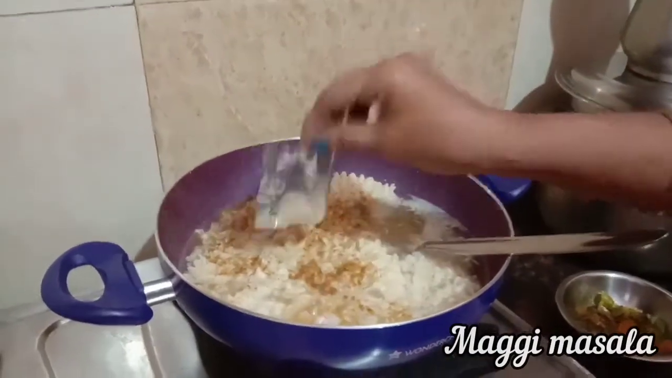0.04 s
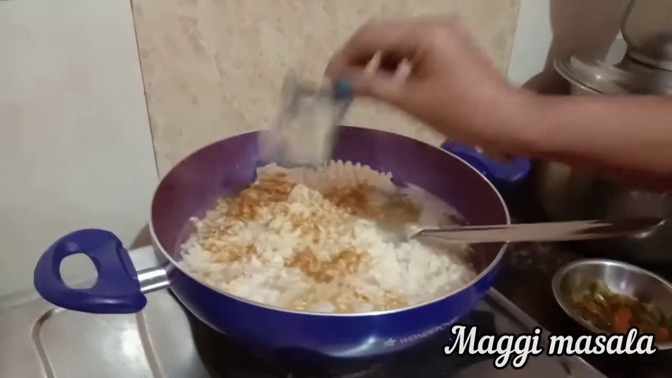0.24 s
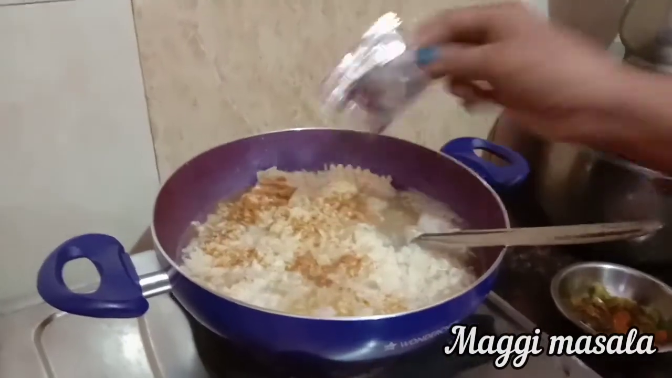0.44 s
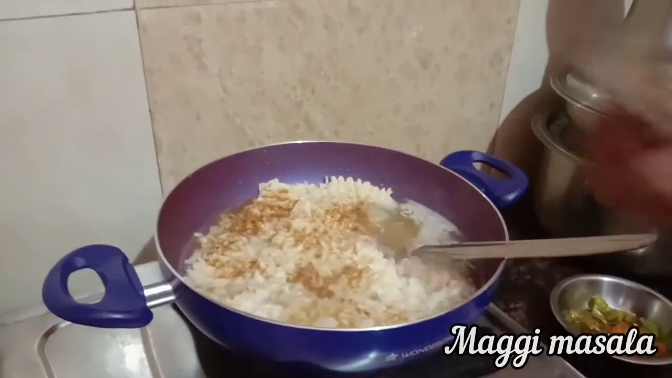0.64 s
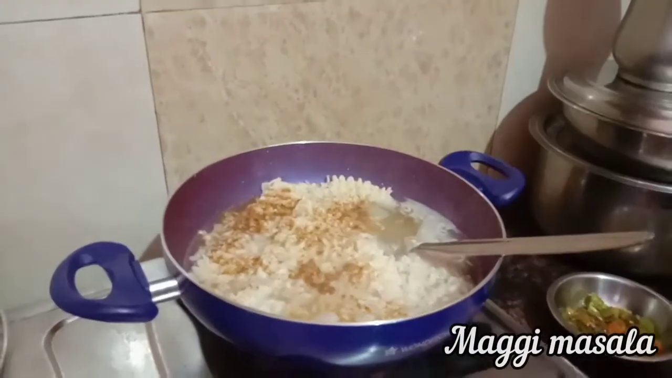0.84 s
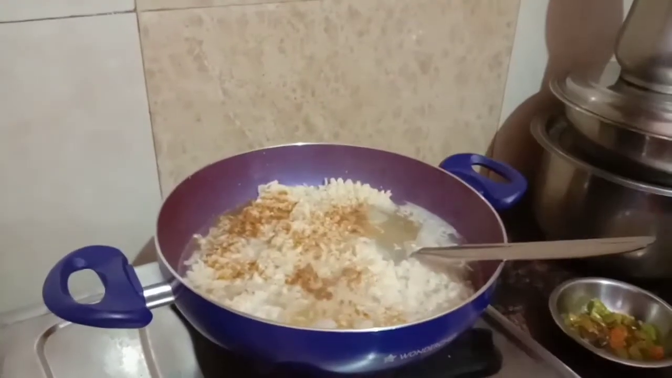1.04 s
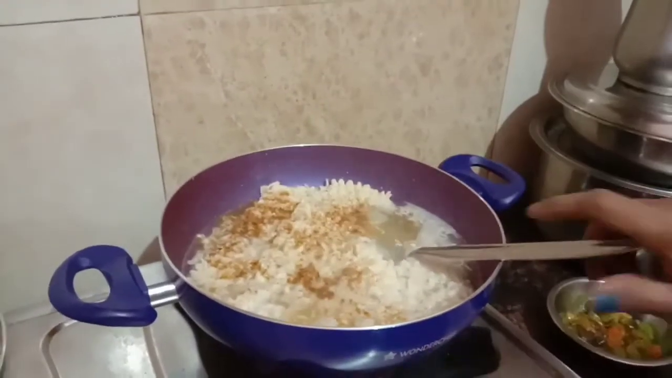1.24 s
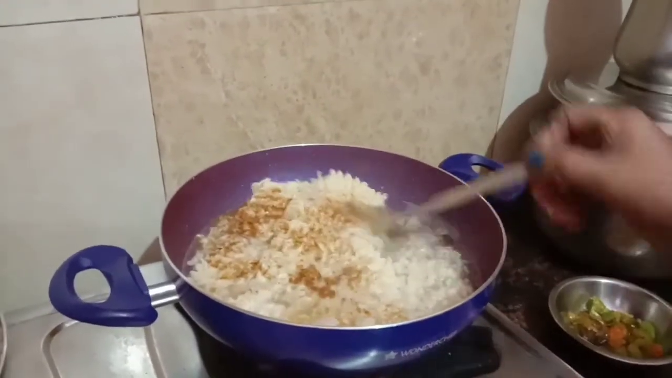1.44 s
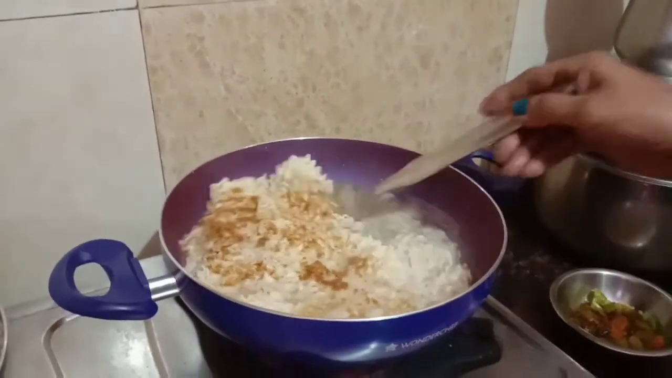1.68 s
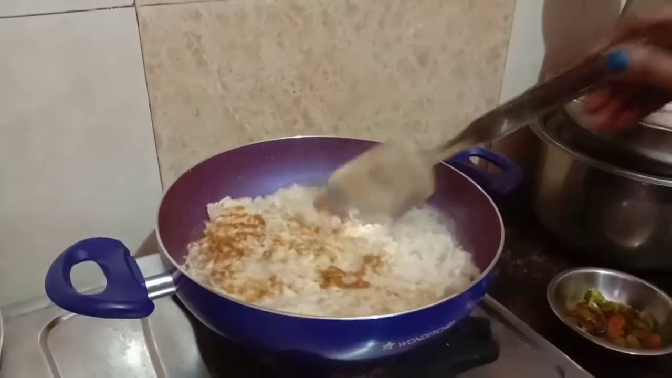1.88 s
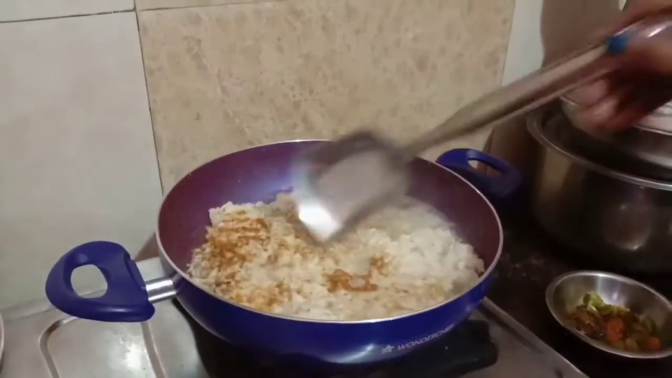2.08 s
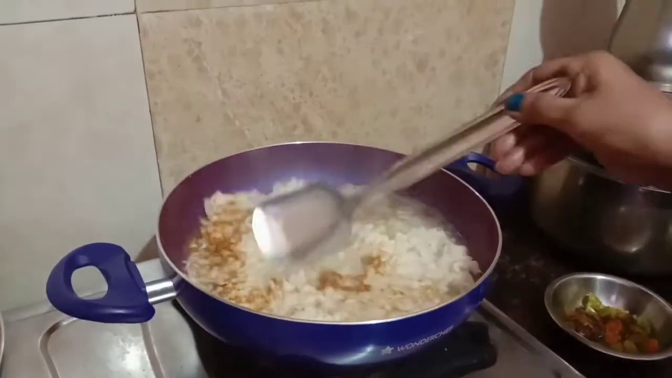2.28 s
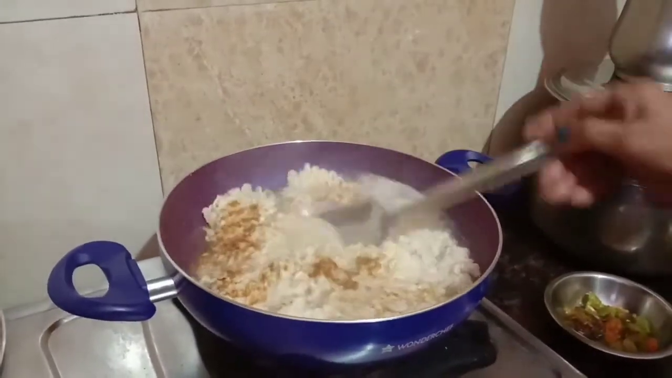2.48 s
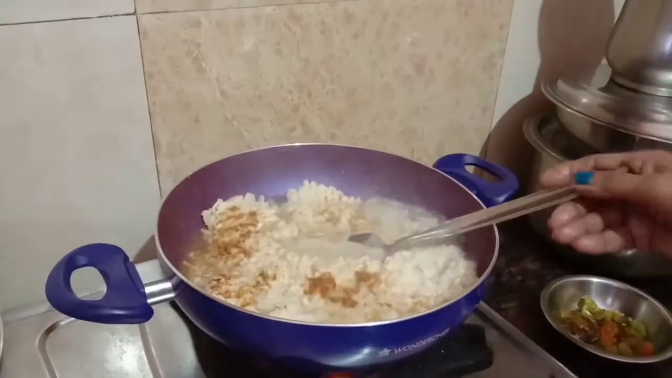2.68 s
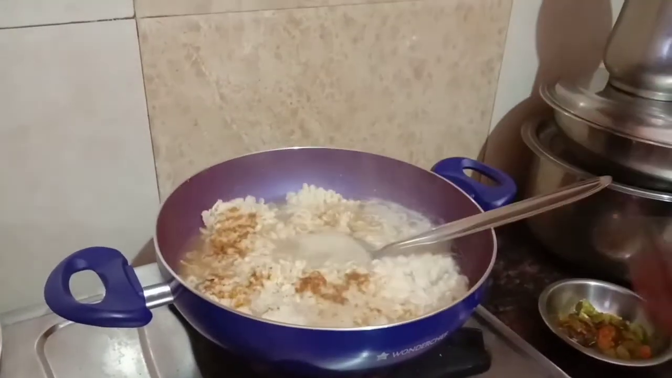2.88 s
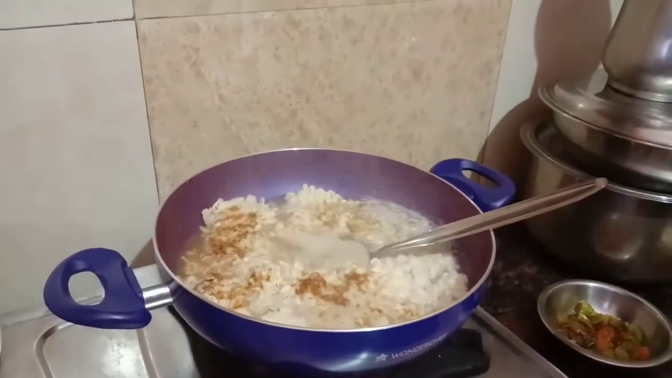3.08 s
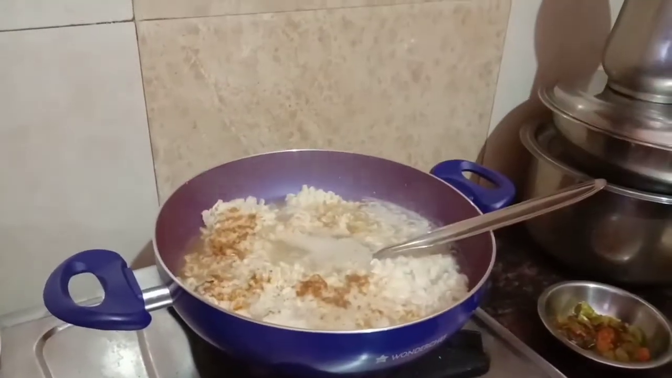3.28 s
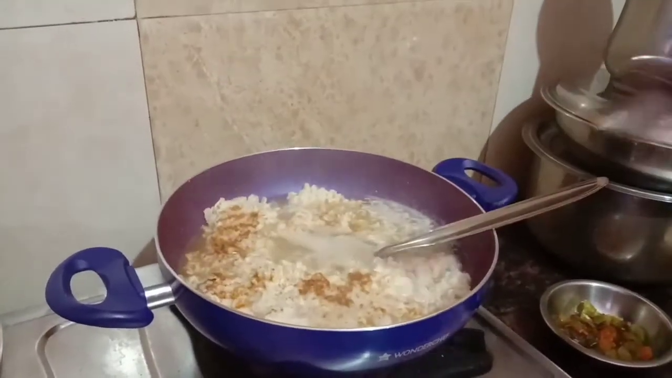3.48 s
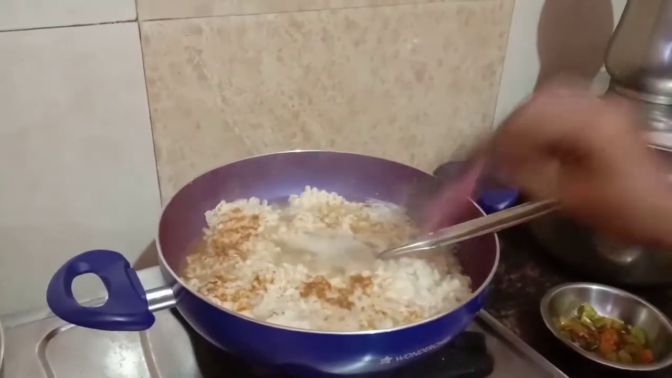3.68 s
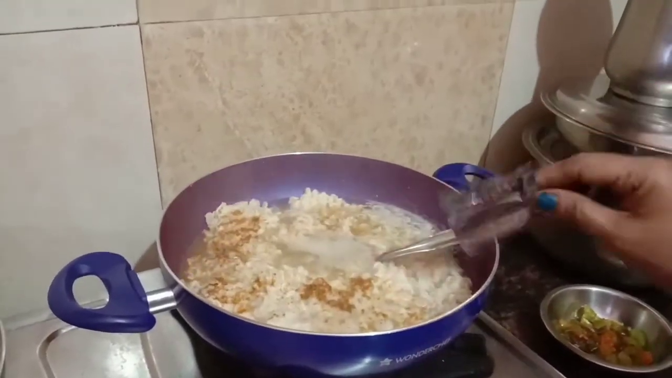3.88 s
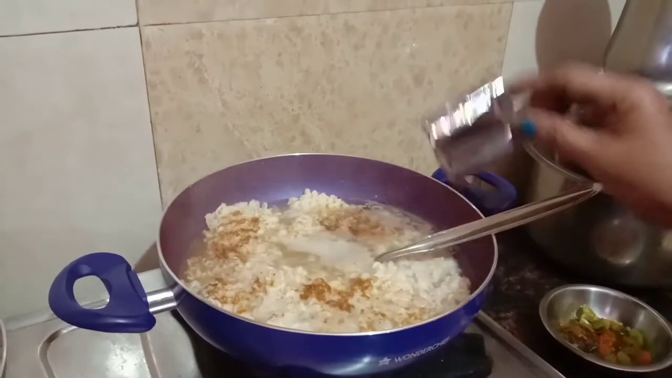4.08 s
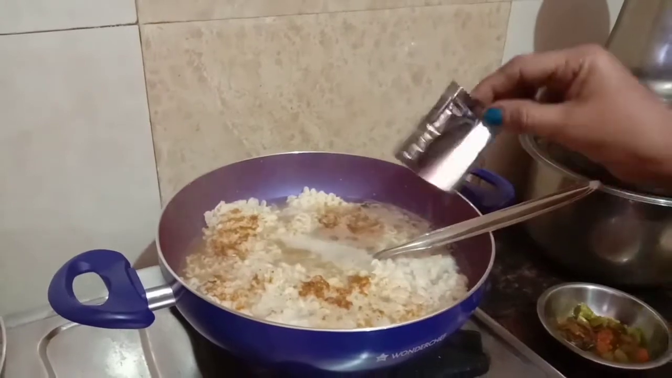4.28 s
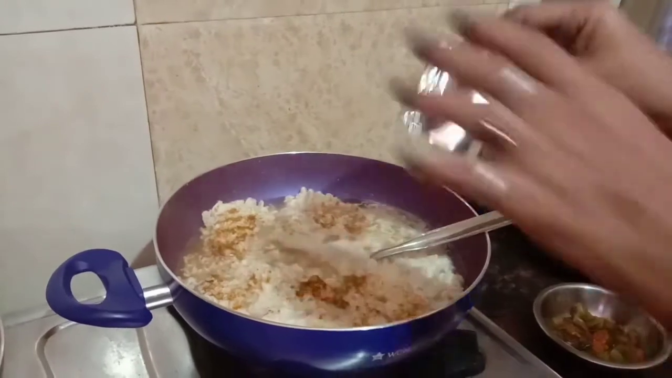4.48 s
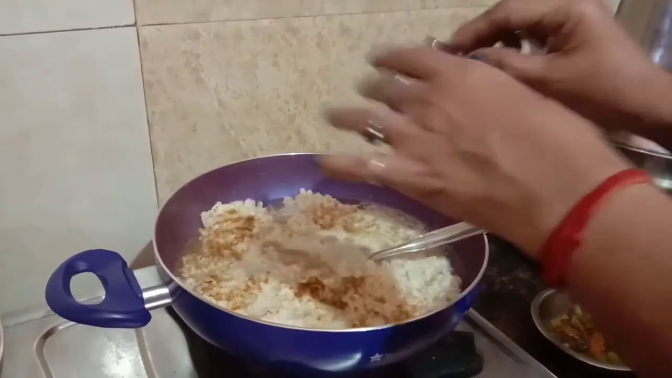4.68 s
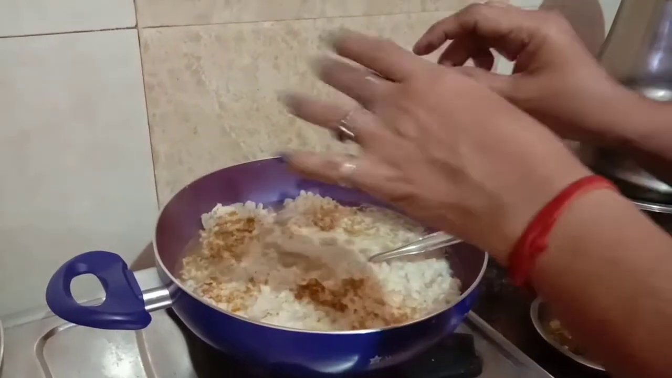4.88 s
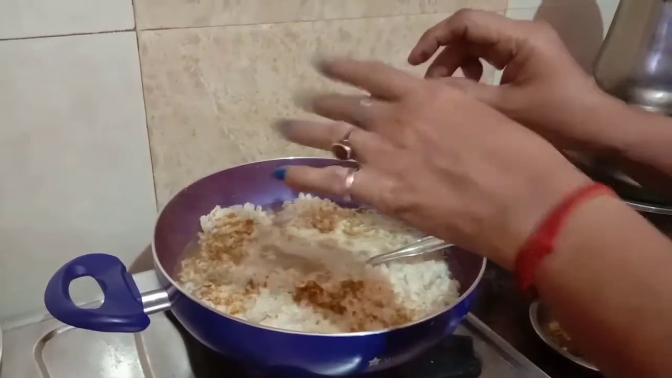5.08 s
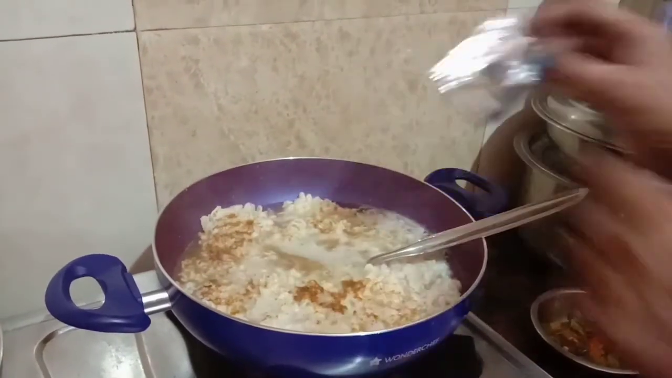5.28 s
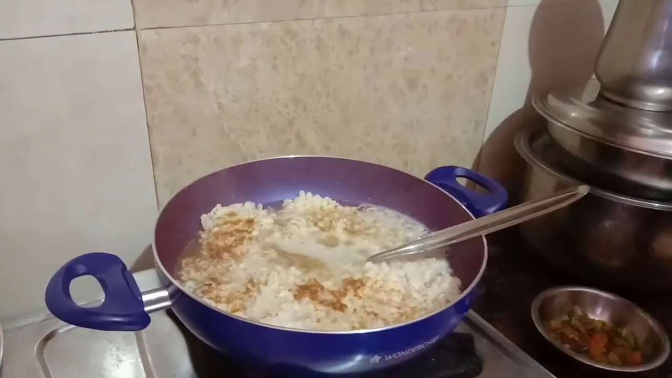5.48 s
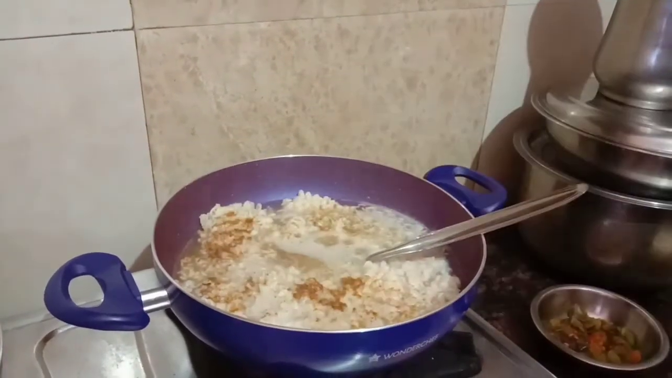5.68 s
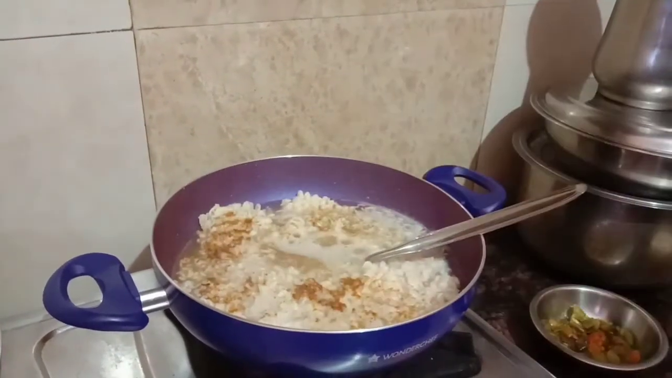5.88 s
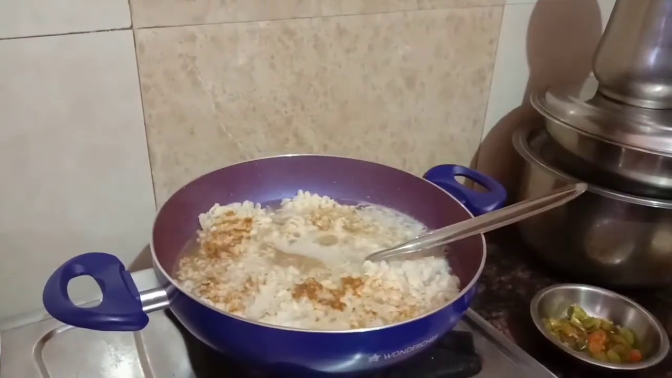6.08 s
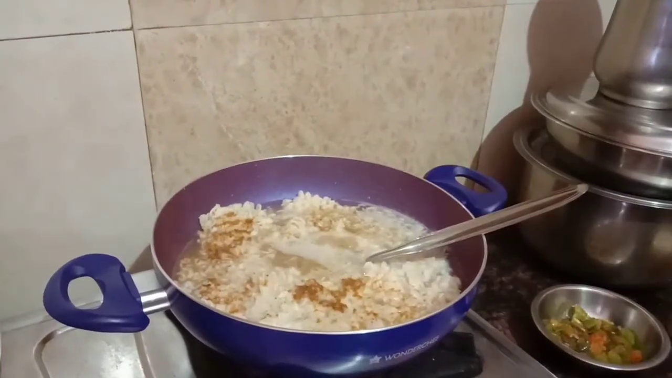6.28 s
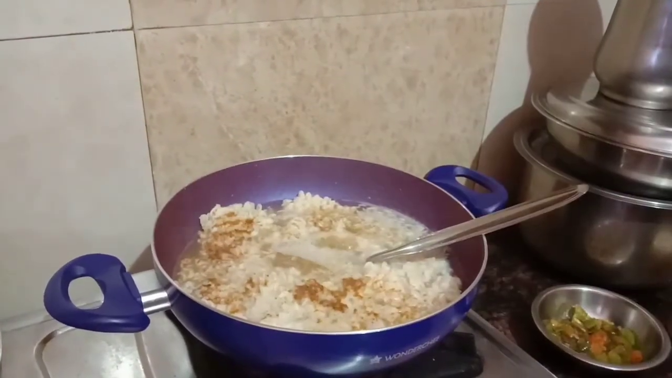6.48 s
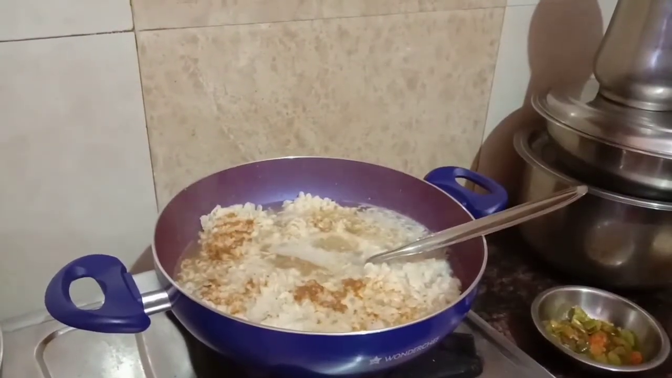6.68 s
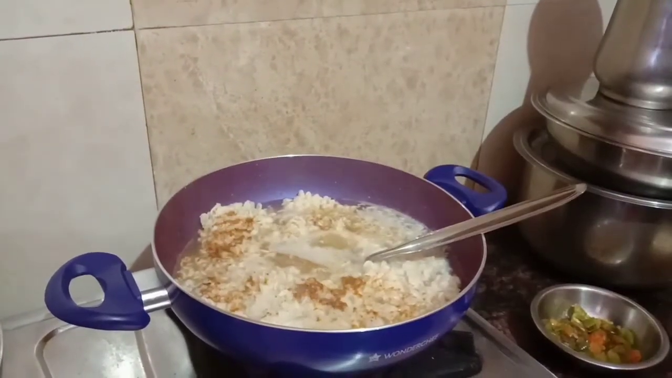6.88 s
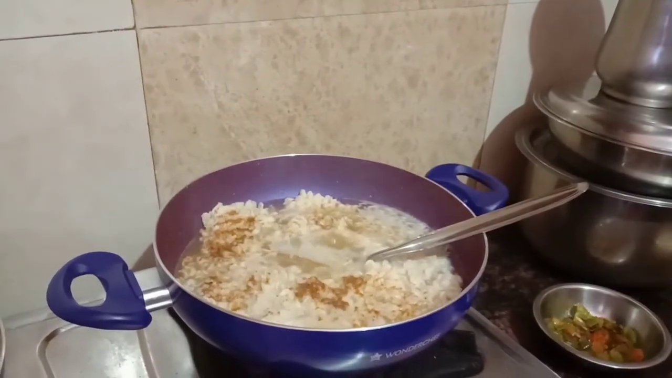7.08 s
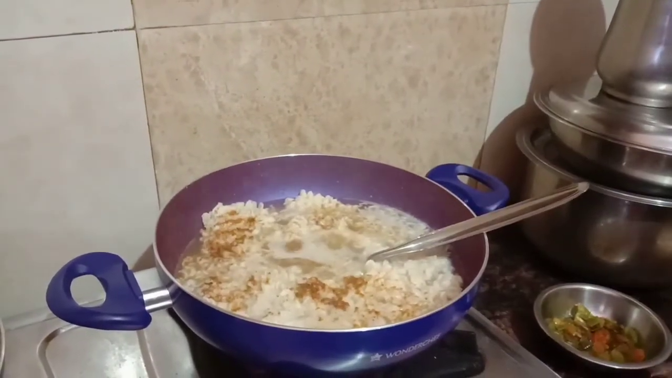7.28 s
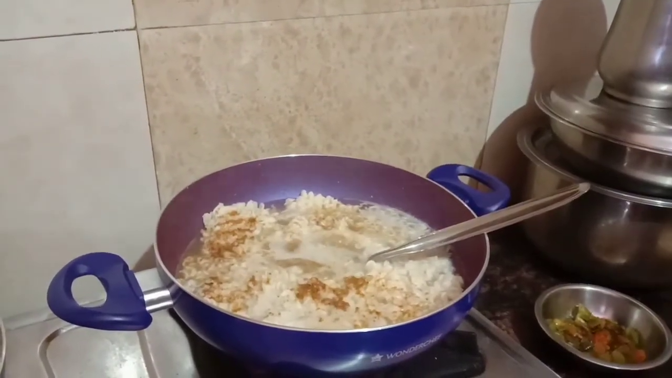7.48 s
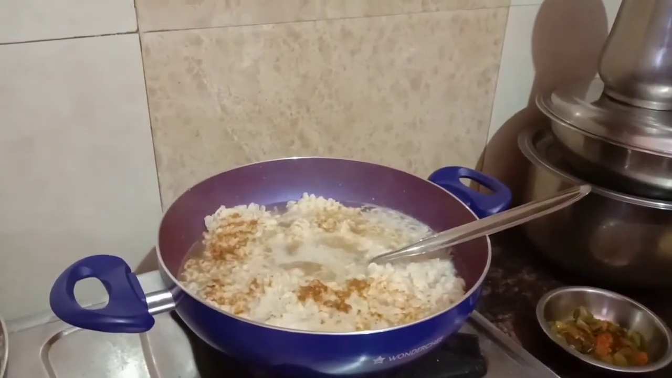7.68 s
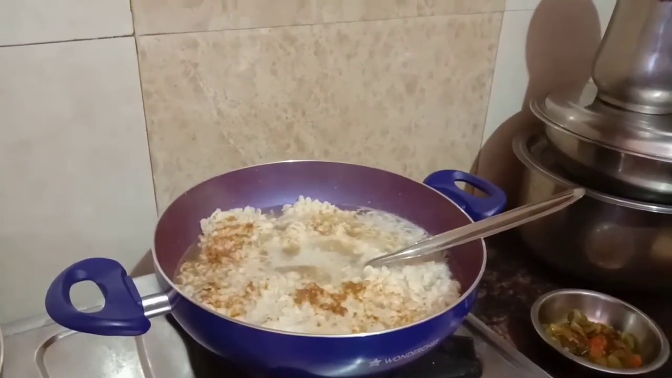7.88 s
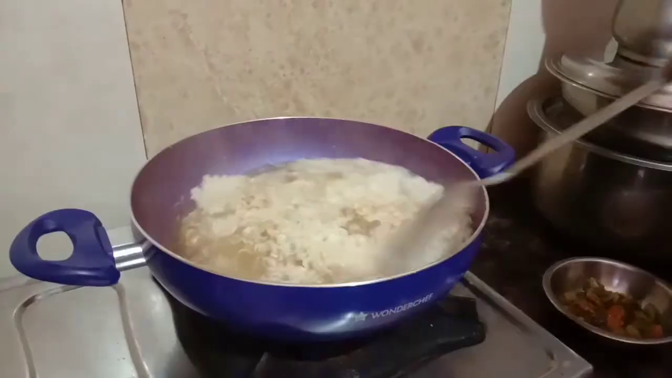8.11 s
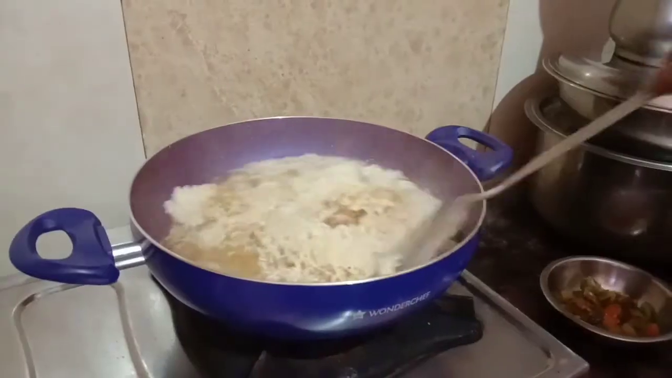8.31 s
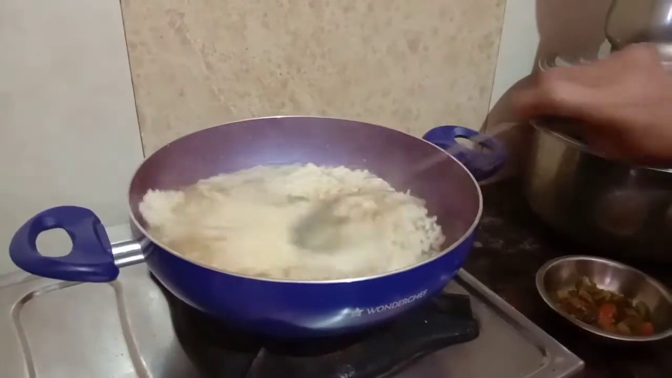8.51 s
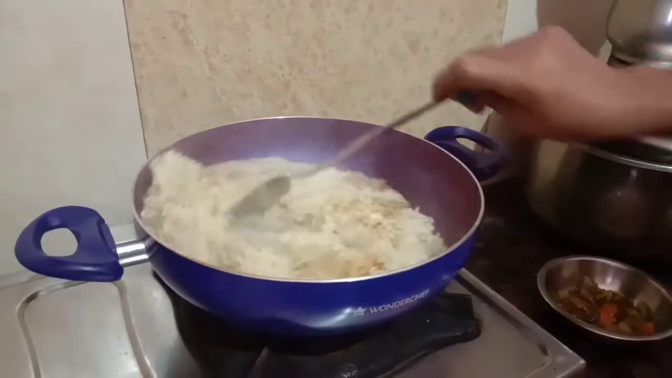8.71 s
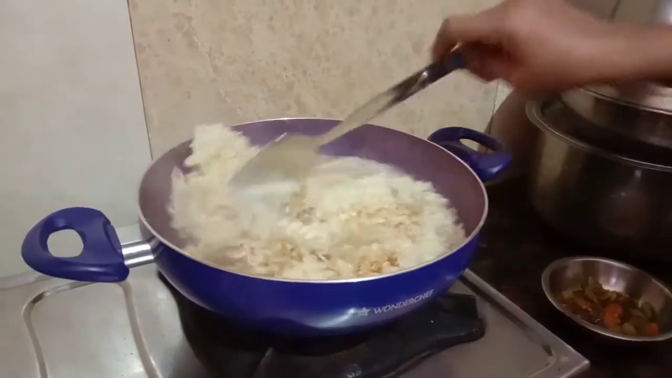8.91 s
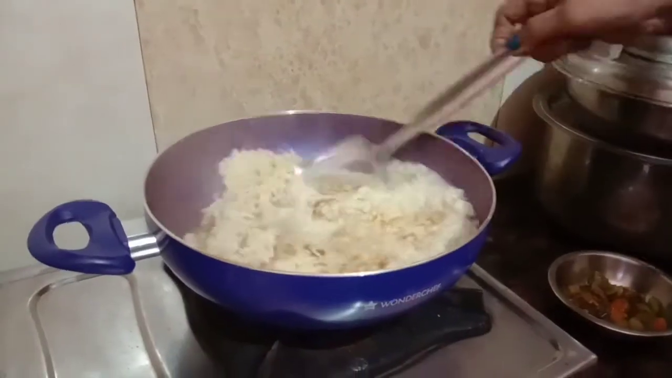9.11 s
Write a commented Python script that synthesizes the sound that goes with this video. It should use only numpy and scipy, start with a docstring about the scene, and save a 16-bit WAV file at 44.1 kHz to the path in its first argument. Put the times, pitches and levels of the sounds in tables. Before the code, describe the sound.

Noodles fizz and bubble in a pan over a gas flame while foil crackles, a steel spatula knocks and scrapes, and fingers bump the microphone.

```python
"""A finger rubs and briefly muffles a hand-held camera over noodles simmering on a gas flame in a small tiled kitchen.
Water fizzes as showers of tiny impulses, bubbles pop as rising chirps, and the pan throbs low as filtered noise.
A foil sachet crinkles in dying bursts of creases and is flicked empty; a steel spatula knocks and scrapes the pan.
Stirring quells the bubbles, then the boil builds up again.
Soft bumps and clicks sit right at the microphone; the sound drops out briefly near 8 s."""
import sys
import numpy as np
from scipy import signal
from scipy.fft import rfft, irfft, next_fast_len
from scipy.io import wavfile
from scipy.ndimage import uniform_filter1d, map_coordinates

SR = 44100
rng = np.random.default_rng(int(sys.argv[2]) if len(sys.argv) > 2 else 0)


def generate_wav(signal):
    """Clip the signal to [-1, 1] and save it as 16-bit WAV at the path in sys.argv[1]."""
    frames = np.transpose(np.atleast_2d(signal))
    scaled = np.clip(frames, -1, 1) * 32767
    pcm = np.round(scaled).astype(np.int16)
    wavfile.write(sys.argv[1], SR, pcm)


N = 403424
TIME = np.arange(N) / SR  # s
AGE = np.arange(SR // 2) / SR  # time since the start of an event, s

# tone of bubbling water: (frequency [Hz], level [dB])
BUBBLING_TONE = [(100, -27.5), (280, -7), (450, -10), (800, 3), (1000, -18), (1300, -7), (1700, -4.5),
                 (2500, 0.5), (4000, -2.5), (7000, -3.5), (16000, -19.5)]


def amp(db):
    """Decibels to gain."""
    return 10 ** (np.asarray(db) / 20)


def unit(x):
    """Scale to rms 1."""
    return x / np.sqrt(np.mean(x ** 2) + 1e-20)


def crest(x):
    """Scale so that the loudest 4 ms have rms 1."""
    loudest = uniform_filter1d(x ** 2, size=176, mode="constant").max()
    return x / np.sqrt(loudest + 1e-20)


def spike(x):
    """Scale to a peak of 1."""
    return x / np.abs(x).max()


def along(points, hz):
    """Read (Hz, value) points on a log frequency axis."""
    f, v = np.transpose(points)
    return np.interp(np.log(hz + 1), np.log(np.abs(f) + 1), v)


def gains(rows):
    """One gain per sample for each dB column after the time."""
    s, *columns = np.transpose(rows)
    return [amp(np.interp(TIME, s, column)) for column in columns]


def during(rows):
    """1 while a curve lasts, with soft edges."""
    inside = (TIME >= rows[0][0]) & (TIME <= rows[-1][0])
    return uniform_filter1d(1. * inside, size=200)


def wobble(rate):
    """A smooth random curve, rate knots a second."""
    knots = rng.standard_normal(int(N * rate / SR) + 4)
    return map_coordinates(knots, [TIME * rate])


def coloured(x, curve_db):
    """Filter by the gain curve_db(Hz) with minimum phase, so that nothing sounds ahead of its cause."""
    size = 2 * next_fast_len(len(x) // 2 + 4096)
    response = amp(curve_db(np.fft.rfftfreq(size, 1 / SR)))
    cepstrum = irfft(np.log(response + 1e-6))
    cepstrum[1:size // 2] *= 2
    cepstrum[size // 2 + 1:] = 0
    return irfft(rfft(x, size) * np.exp(rfft(cepstrum)))[:len(x)]


def shaped(x, spectrum):
    """Pass x through a (Hz, dB) spectrum."""
    return coloured(x, lambda hz: along(spectrum, hz))


def lifted(hz, resonances):
    """The gain in dB of (Hz, width Hz, lift dB) resonances."""
    return sum(db / (1 + (2 * (hz - f) / width) ** 2) for f, width, db in resonances)


def in_pan(x, spectrum):
    """Pass x through a spectrum and the resonances of the air enclosed by the pan."""
    # air resonances: (frequency [Hz], width [Hz], lift [dB])
    bowl = [(731, 37, -6.5), (1240, 223, 17.5), (2117, 240, 7), (2780, 280, 4)]
    return coloured(x, lambda hz: along(spectrum, hz) + lifted(hz, bowl))


def balanced(x, *levels_db):
    """Split a hit into body, middle and treble at 2.5 and 5 kHz, and set the crest level of each."""
    def below(hz):
        lowpass = signal.butter(4, hz, fs=SR, output="sos")
        return signal.sosfiltfilt(lowpass, np.pad(x, (200, 0)), padlen=0)[200:]

    body, lower = below(2500), below(5000)
    bands = (body, lower - body, x - lower)
    return sum(amp(db) * crest(band) for db, band in zip(levels_db, bands))


def add(out, s, x):
    """Mix x into out at time s."""
    part = out[max(round(s * SR), 0):][:len(x)]
    part += x[:len(part)]


def grains(rate, spread_db, size):
    """Random tiny impulses, rate a second, of widely differing strength."""
    struck = rng.random(size) < rate / SR
    strength = rng.standard_normal(size)
    return unit(struck * strength * amp(spread_db * np.clip(rng.standard_normal(size), -2, 2)))


def scattered(start, end, rate):
    """Uneven times, rate a second, as rows (s, normal draw, normal draw); none if end precedes start."""
    draws = rng.standard_normal((40, 3))
    steps = np.arange(len(draws)) + .5 + np.tanh(draws[:, 0]) / 2
    times = start + steps / rate
    return np.column_stack([times, draws[:, 1:]])[times < end]


def kitchen(x, wet_db, near_db):
    """Direct sound, quick reflections from the tiled corner, and a room tail whose treble dies sooner."""
    # reverberation of the kitchen: (frequency [Hz], time to fall 60 dB [s])
    decay = [(150, 0.59), (1200, 0.28), (4000, 0.26), (7000, 0.23), (14000, 0.17)]
    hz, t, z = signal.stft(rng.standard_normal(len(AGE)), SR, nperseg=256)
    fading = z * amp(-60 * t / along(decay, hz)[:, None])
    tail = signal.istft(fading, SR, nperseg=256)[1][:len(AGE)]
    corner = rng.standard_normal(len(AGE)) * amp(-60 * AGE / 0.078) * (AGE > .001)
    answer = amp(wet_db) * tail / np.linalg.norm(tail) + amp(near_db) * corner / np.linalg.norm(corner)
    return x + signal.fftconvolve(x, answer)[:len(x)]


def boil():
    """Gains of fizz, bubbling and throb: all follow the vigour; stirring quells the bubbling for a while."""
    # how hard the water boils: (time [s], vigour [dB])
    vigour_curve = [(0, 3), (1.25, -1.5), (1.65, -3), (2.4, -2), (2.85, -4.5), (3.9, -2), (4.4, 0.5),
                    (5.15, -1.5), (5.55, 3.5), (5.8, -3), (6.0, -0.5), (6.9, -2.5), (7.45, 3.5), (8.0, 14),
                    (8.2, -8), (8.5, -9), (9.15, 1)]
    # moments when the spatula breaks up the bubbles: time [s]
    stirs = [1.94, 8.48]
    fizz_db, bubbling_db, throb_db = -48.5, -55, -60.5  # relative levels at vigour 0
    bubbling_grows, throb_grows = 0.44, 0.35  # dB per dB of vigour
    stir_loss_db, collapse_s, recover_s = 16, 0.26, 0.81  # recovery begins before the full loss is reached

    vigour = np.interp(TIME, *np.transpose(vigour_curve))
    since = np.maximum(TIME - np.array(stirs)[:, None], 0)
    quelled = ((1 - np.exp(-since / collapse_s)) * np.exp(-since / recover_s)).sum(axis=0)
    fizz = amp(fizz_db + vigour)
    bubbling = amp(bubbling_db + bubbling_grows * vigour - stir_loss_db * quelled)
    throb = amp(throb_db + throb_grows * vigour)
    return fizz, bubbling, throb


def bubble(pitch_hz, cycles, age):
    """A bubble rings for a few cycles while its pitch rises."""
    life = age * pitch_hz / max(cycles, 4)
    return np.sin(2 * np.pi * pitch_hz * age * (1 + 0.28 * np.minimum(life, 2))) * amp(-60 * life)


def burbles(rate, pitch_hz, spread_db, cycles):
    """A stream of small bubbles of random size, pitched up to an octave either side of pitch_hz."""
    out = np.zeros(N)
    for when, size, strength in rng.random((int(rate * N / SR), 3)):
        blip = bubble(pitch_hz * 4 ** (size - .5), cycles, AGE[:2000])
        add(out, when * N / SR, amp(-spread_db * strength) * blip)
    return unit(out)


def simmer():
    """Fizz and small bubbles well up by turns at three spots of the pan, over the flame's uneven rumble."""
    # tone of the fizz: (frequency [Hz], level [dB])
    fizz_tone = [(300, -8), (1000, -17.5), (2500, -15.5), (4000, 2), (5000, -9.5), (6000, 5.5), (7200, 5),
                 (8000, 2.5), (16000, -2)]
    # tone of the low throb: (frequency [Hz], level [dB])
    throb_tone = [(20, -12), (45, -23.5), (80, -3.5), (120, 4), (150, -4), (200, -14.5), (300, -11),
                  (500, -26.5), (1500, -43)]
    fizz, bubbling, throb = boil()
    spray, clumps = np.zeros((2, N))
    for spot in range(3):
        fine = grains(rate=2000, spread_db=4, size=N) * amp(3.5 * wobble(13))
        spray += unit(kitchen(fine, wet_db=-5.0, near_db=3))
        bursts = grains(rate=600, spread_db=4, size=N)
        welling = amp(6 * wobble(18))
        blips = burbles(rate=45, pitch_hz=1629, spread_db=17.0, cycles=27.0)
        clumps += unit(kitchen((bursts + amp(-3.5) * blips) * welling, wet_db=7.0, near_db=3.5))
    flame = unit(shaped(rng.standard_normal(N), throb_tone) * amp(2.9 * wobble(30)))
    bubbles = unit(in_pan(clumps, BUBBLING_TONE))
    return fizz * unit(in_pan(spray, fizz_tone)) + bubbling * bubbles + throb * flame


def pops():
    """A large bubble swells, tears and throws a short spray; steam pockets heave as brief low tones."""
    # large bubbles bursting: (time [s], relative level [dB], spray over body [dB])
    large = [(0.751, -39.5, 3.5), (4.163, -43, 3), (4.3, -46, -13), (4.455, -39.5, -20), (5.203, -44, -2.5),
             (5.303, -37.5, 0), (5.421, -34, -14), (5.934, -37, -5), (6.124, -40, -20), (6.267, -43.5, -20),
             (6.593, -41, -1.5), (6.694, -40, -16), (6.763, -40.5, -29), (7.139, -40.5, 2),
             (7.297, -35, -20), (7.41, -42, -5), (7.577, -40.5, 2.5), (7.662, -42, 6.5)]
    # steam pockets under the noodles: (time [s], relative level [dB])
    heaves = [(5.464, -53), (5.686, -52), (6.532, -54), (6.718, -49.5), (7.204, -51.5), (7.328, -53),
              (7.571, -48)]
    # smaller bubbles burst at random while the boil rolls: (start [s], end [s])
    rolling = [(4.0, 5.5), (5.95, 8.5)]
    pop_rate = 3.1  # a second
    pop_db, pop_spread_db = -43.5, -4.5  # relative level
    spray_db, spray_spread_db = -2.5, 0.5  # over the body

    out = np.zeros(N)
    smaller = [(s, pop_db + pop_spread_db * a, spray_db + spray_spread_db * b)
               for span in rolling for s, a, b in scattered(*span, pop_rate)]
    for s, body_db, over_db in list(large) + smaller:
        swell = amp(-60 * AGE / .11) * (1 - np.exp(-AGE / .005))
        tear = grains(rate=3000, spread_db=4, size=len(AGE)) * swell
        sound = crest(in_pan(tear, BUBBLING_TONE))
        # one chirp at once, its two neighbours within some 30 ms and ever weaker
        for order, (size, delay) in enumerate(rng.random((3, 2))):
            chirp = bubble(1400 * 3 ** (size - .5), 36, AGE)
            add(sound, order * delay * .016, amp(2 - 2 * order) * chirp)
        sound = kitchen(sound, wet_db=-2.5, near_db=-3.5)
        add(out, s, amp(-8.0) * balanced(sound, body_db, body_db + over_db, body_db + over_db + 1))
    for s, db in heaves:
        pitch_hz = 122 * np.exp(0.089 * rng.standard_normal())
        thump = np.sin(2 * np.pi * pitch_hz * AGE) * AGE * np.exp(-AGE / 0.011)
        add(out, s, amp(db + 5.0) * crest(thump))
    return out


def handling():
    """Skin rubs the camera, its case creaks and ticks, and bumps reach the microphone with no room."""
    # a finger sliding on the camera: (time [s], level [dB])
    rub_curve = [(0.08, -41.5), (0.25, -48), (0.33, -36), (0.43, -49.5), (0.51, -44), (0.55, -51)]
    # tone of skin on the case: (frequency [Hz], level [dB])
    skin = [(60, 0.5), (300, -8.5), (600, -15), (1200, -0.5), (2000, -5.5), (3200, 10.5), (4200, 10.5),
            (5000, -5), (7000, -21), (16000, -13)]
    # the finger sticks and slips: (time [s], level [dB])
    catches = [(0.197, -33.5), (0.2284, -34), (0.2647, -27), (0.314, -27)]
    # the case creaks: (time [s], relative level [dB], body relative to that [dB])
    ticks = [(0.4588, -22.5, -6), (0.462, -25, -7), (0.467, -25, -19), (0.474, -25, -18), (0.493, -31, 9),
             (0.5359, -28, 3), (7.858, -25, -22), (7.947, -21.5, 2.5), (7.955, -17, -20)]
    # soft bumps: (time [s], level [dB], pitch [Hz], time to fall 60 dB [s], tap relative to tone [dB])
    bumps = [(0.097, -38.5, 107, 0.55, 1.5), (0.13, -29, 102, 0.12, 2), (0.265, -31, 70, 0.2, -0.5),
             (0.284, -27, 65.6, 0.061, -28), (0.514, -32.5, 106, 0.12, 14), (0.567, -44.5, 180, 0.1, 6.5),
             (0.712, -46, 129, 0.17, 7.5), (7.901, -30, 151, 0.079, 11), (8.036, -39.5, 122, 0.097, 9.5)]
    # tone of the tap in a bump: (frequency [Hz], level [dB])
    tap_tone = [(40, -24.5), (150, 16.5), (350, 17), (600, 6.5), (1200, 7), (2000, -18), (6000, -57)]

    friction = grains(rate=14000, spread_db=2, size=N) * amp(2.5 * wobble(60))
    out = gains(rub_curve)[0] * during(rub_curve) * unit(shaped(friction, skin))
    for s, db in catches:
        slip = rng.standard_normal(len(AGE)) * AGE * np.exp(-AGE / 0.0031)
        add(out, s, amp(db) * crest(shaped(slip, skin)))

    impulse = 1. * (AGE == 0)
    tick = spike(shaped(impulse, [(200, -44), (2000, 11.5), (16000, 10.0)]))
    case = np.sin(2 * np.pi * 1500 * AGE) * amp(-60 * AGE / 0.0086)
    for s, db, body_db in ticks:
        add(out, s, amp(db + 13.5) * tick + amp(db + body_db) * case)

    tap = spike(shaped(impulse, tap_tone))
    for s, db, hz, t60, tap_db in bumps:
        tone = np.sin(2 * np.pi * hz * AGE) * amp(-60 * AGE / t60)
        add(out, s, amp(db) * (tone + amp(tap_db) * tap))
    return out


def strokes():
    """The blade drags through wet noodles, slips in tiny steps over the pan, and sings."""
    # spatula strokes: (start [s], attack [s], hold [s], release [s], then relative levels of
    # drag through noodles [dB], scrape on the pan [dB], edge rasp [dB], blade singing [dB])
    passes = [(1.663, 0.036, 0.055, 0.058, -80, -37, -47, -62),
              (1.943, 0.08, 0.18, 0.36, -90, -69, -63, -54.5),
              (8.819, 0.005, 0.071, 0.21, -44, -41, -76, -58),
              (8.941, 0.048, 0.13, 0.051, -54, -41.5, -47.5, -41.5)]
    # tones of the four layers: (frequency [Hz], level [dB])
    drag_tone = [(60, -36), (200, -11), (380, 9.5), (540, -3.5), (800, 1.5), (2000, -52)]
    scrape_tone = [(400, -26.5), (750, -19), (1100, 2), (1400, -1.5), (1800, -6), (2400, -30),
                   (5000, -36.5)]
    rasp_tone = [(900, -26), (1700, 5.5), (2300, 0.5), (3200, -1), (4100, -5.5), (5000, -4), (6200, 1.5),
                 (16000, -30.5)]
    sing_tone = [(600, -12), (1250, 2), (1850, -11), (2110, 9), (2350, -6.5), (2720, 13), (3200, -11.5),
                 (4100, 1.5), (5000, -13.5), (9000, -25)]
    depth_db, bite_db = 32, 17.5  # rise from first touch; growth of the edge rasp over the hold

    def slips(spectrum):
        return unit(shaped(grains(rate=2700, spread_db=2.5, size=N), spectrum))

    # the drag deepens in pitch as the blade digs in
    sinking = np.interp(TIME, [8.82, 9.0], [1.2, .7])
    drag = np.interp(np.cumsum(sinking) % N, np.arange(N), slips(drag_tone))
    scrape, rasp, sing = slips(scrape_tone), slips(rasp_tone), slips(sing_tone)
    out = np.zeros(N)
    for start, attack, hold, release, drag_db, scrape_db, rasp_db, sing_db in passes:
        corners = start + np.cumsum([0, attack, hold, release])
        press = np.column_stack([corners, [-depth_db, 0, 0, -depth_db]])
        bite = bite_db * np.interp(TIME, corners[1:3], [-.5, .5])
        contact = amp(drag_db) * drag + amp(scrape_db) * scrape
        contact += amp(rasp_db + bite) * rasp + amp(sing_db) * sing
        out += during(press) * gains(press)[0] * contact
    return amp(-3) * kitchen(out, wet_db=-0.5, near_db=1)


def ringing(modes):
    """Decaying sine modes, at new strengths and phases for every blow."""
    out = np.zeros(len(AGE))
    for hz, db, t60 in modes:
        level = amp(db + rng.normal(0, 0.92) - 60 * AGE / t60)
        out += level * np.sin(2 * np.pi * (hz * AGE + rng.random()))
    return crest(out)


def knocks():
    """The spatula clacks on the pan through its own resonances, and both ring on."""
    # spatula meets pan: (time [s], relative level [dB], clink over body [dB], treble over body [dB],
    # pan ring relative to clack [dB], spatula ring relative to clack [dB])
    blows = [(1.3005, -32.5, -10.5, -7.5, -40, -7), (1.407, -29, -3.5, 0.5, -39, -10),
             (2.590, -25.5, 4.5, 8, -33.5, -13), (2.659, -38, 5, 6.5, -35, -12),
             (8.150, -34, 0.5, -5.5, -14.5, -26), (8.325, -43.5, 10.5, 14, -24, -30)]
    # modes of the spatula: (frequency [Hz], level [dB], time to fall 60 dB [s])
    steel = [(805, -7, 0.064), (1248, 5.5, 0.083), (1375, -4, 0.13), (2354, -35.5, 0.23), (2660, -12, 0.13),
             (3080, -1.5, 0.037), (3710, -14, 0.067), (4064, -15, 0.067), (5770, 1.5, 0.1),
             (6105, -3, 0.18), (7170, 12.5, 0.05)]
    # modes of the pan: (frequency [Hz], level [dB], time to fall 60 dB [s])
    pan = [(119.1, -14.5, 0.93), (225, -13.5, 0.15), (476, -5.5, 0.32), (566, -6.5, 0.16),
           (829, -4.5, 0.34), (1242, 12, 0.061), (2320, 3.5, 0.14), (2800, -4.5, 0.14)]
    # tone of the clack: (frequency [Hz], level [dB])
    clack_tone = [(100, -12.5), (480, -27.5), (780, -7), (1300, -2), (1800, 4.5), (3000, -6), (4000, 2),
                  (5000, -1), (6200, 8), (7300, 9.5), (10000, 10), (16000, 8)]

    out = np.zeros(N)
    blade = [(hz, 220, 9) for hz, db, t60 in steel]  # Hz, width Hz, lift dB
    for s, db, clink_db, treble_db, pan_db, steel_db in blows:
        burst = rng.standard_normal(len(AGE)) * amp(-60 * AGE / 0.025)
        clack = coloured(burst, lambda hz: along(clack_tone, hz) + lifted(hz, blade))
        sound = crest(clack) + amp(steel_db) * ringing(steel) + amp(pan_db) * ringing(pan)
        add(out, s, balanced(kitchen(sound, wet_db=7.5, near_db=4), db, db + clink_db, db + treble_db))
    return out


def sachet():
    """Each crackle is a snap and a quickly thinning shower of creases; flicked foil springs back."""
    # sharp crackles, mostly foil buckling; the one at 6.309 s is probably a spitting bubble:
    # (time [s], relative level [dB], fullness [dB])
    crackles = [(0.037, -42, 8), (0.8205, -21, 0.5), (0.8666, -25, 3.5), (0.8853, -19.5, 3.5),
                (0.9537, -24, 0.5), (1.1496, -38.5, 1.5), (1.3555, -26.5, 4), (2.9455, -39, -6),
                (3.1224, -24, -4.5), (3.161, -32.5, 2.5), (3.528, -30.5, -4.5), (3.6206, -33, -10),
                (3.679, -33, -16), (4.1267, -35, -3), (4.984, -24, 6), (5.9535, -31.5, 4.5),
                (6.309, -27, -11), (6.976, -35.5, -7), (7.0095, -35, 3.5), (7.3298, -35, 3),
                (7.77, -28, -1), (7.856, -22.5, -2.5), (7.925, -37.5, 19), (7.976, -28, 9.5)]
    # a finger flicks the sachet: (time [s], relative level [dB], time until the foil springs back [s])
    flick_rows = [(4.642, -18.5, 0.031), (4.8133, -13, 0.046), (4.9703, -11, 0.065)]
    # the foil creases faintly in the hand: (start [s], end [s])
    handled = [(0.95, 1.4), (3.2, 3.38), (3.95, 4.55), (7.55, 5.8)]
    # tone of the foil: (frequency [Hz], level [dB])
    foil_tone = [(150, -40), (600, -19), (1200, -11), (1700, -2.5), (2700, -3), (4000, 2), (5000, 1),
                 (6300, 8), (8000, 5.5), (11000, 2), (16000, 1.5)]
    flick_full_db, rebound_db, rebound_full_db = -0.5, -10, 5  # rebound is relative to its flick
    crease_rate = 8.4  # a second
    crease_db, crease_full_db, crease_spread_db = -43, 6, 3  # relative level; fullness; spread of both
    body_db, middle_db = -21.5, -11  # relative to treble, at fullness 0
    body_grows, middle_grows = 1.28, 0.81  # dB per dB of fullness
    # a hard crackle is over fastest: decay constant at snap_db, and the drop in level that doubles it
    snap_s, snap_db, slower_db = 0.0062, -22.5, 13.5

    out = np.zeros(N)
    flicks = [(s, db, flick_full_db) for s, db, delay in flick_rows]
    rebounds = [(s + delay, db + rebound_db, rebound_full_db) for s, db, delay in flick_rows]
    faint = [(s, crease_db + crease_spread_db * a, crease_full_db + crease_spread_db * b)
             for span in handled for s, a, b in scattered(*span, crease_rate)]
    for s, db, full_db in list(crackles) + flicks + rebounds + faint:
        length = snap_s * 2 ** ((snap_db - db) / slower_db)
        creases = grains(rate=8300, spread_db=2.5, size=len(AGE)) * np.exp(-AGE / length)
        sound = kitchen(in_pan(creases, foil_tone), wet_db=5.0, near_db=-15)
        body = db + body_db + body_grows * full_db
        middle = db + middle_db + middle_grows * full_db
        add(out, s, balanced(sound, body, middle, db))
    return out


def scene():
    """A finger briefly muffles the kitchen; nearly mono, with a faint delayed copy opposed in the two channels."""
    # a finger over the microphone port: (time [s], share of the port covered)
    cover_curve = [(0.05, 0), (0.11, 1), (0.5, 0.7), (0.62, 0)]
    # tone through the finger: (frequency [Hz], level [dB])
    covered = [(1000, 7.5), (2500, 13), (4100, 7.5), (5200, -4), (7000, -32), (16000, -7)]
    # level of the faint side copy: (frequency [Hz], side relative to mid [dB])
    copy_level = [(60, -40.5), (2500, -45), (5000, -32.5), (8000, -65.5), (14000, -29.5)]
    air = simmer() + pops() + amp(-2.5) * sachet() + amp(-0.5) * knocks() + strokes()
    cover = np.clip(np.interp(TIME, *np.transpose(cover_curve)), 0, 1)
    mid = (1 - cover) * air + cover * shaped(air, covered) + handling()
    late = np.pad(mid, (61, 0))[:N]  # 1.4 ms behind
    side = shaped(late, copy_level)
    return np.array([mid + side, mid - side])


def record(dry):
    """The microphone's uneven treble, a brief dropout and the band limit."""
    # microphone response: (frequency [Hz], level [dB])
    response = [(25, -26), (60, -3.5), (7400, -3.5), (8300, -15), (10000, -21), (12500, -21), (13900, -35),
                (15000, -6.5), (15600, -15.5)]
    # the sound drops out: (start [s], end [s])
    dropout = (8.046, 8.147)
    top_hz = 15650
    live = uniform_filter1d(1. * ((TIME < dropout[0]) | (TIME > dropout[1])), size=100)
    heard = np.array([shaped(channel, response) for channel in dry])
    sound = heard * (live + amp(-37.5))  # a faint trace is left in the dropout
    size = next_fast_len(N + 8192)
    passed = np.fft.rfftfreq(size, 1 / SR) < top_hz
    return irfft(rfft(sound, size) * passed, size)[:, :N]


dry = scene()
out = record(dry)
generate_wav(out)
```